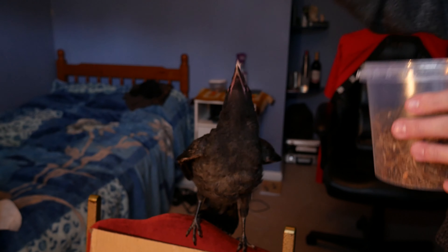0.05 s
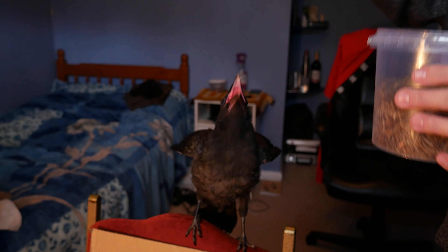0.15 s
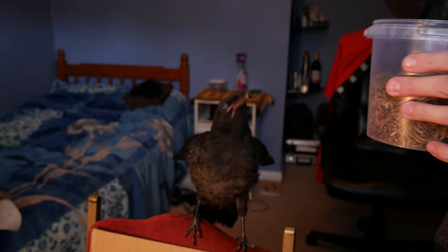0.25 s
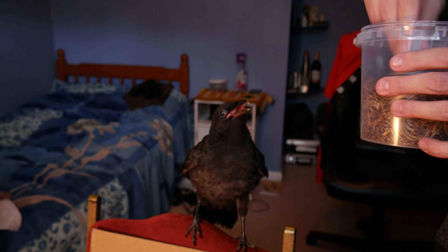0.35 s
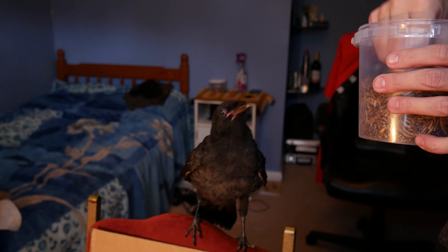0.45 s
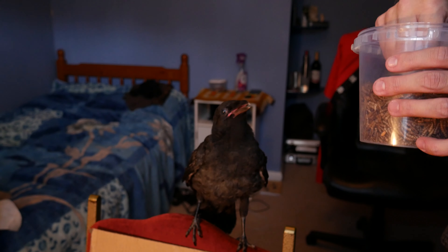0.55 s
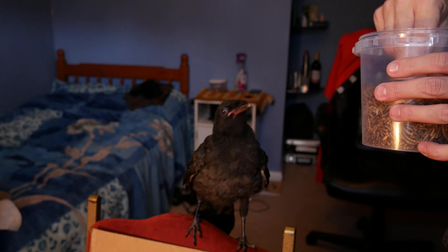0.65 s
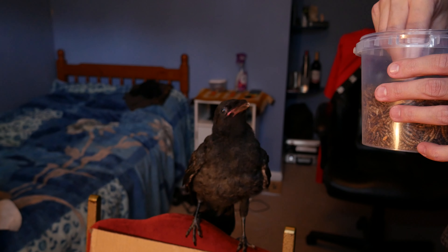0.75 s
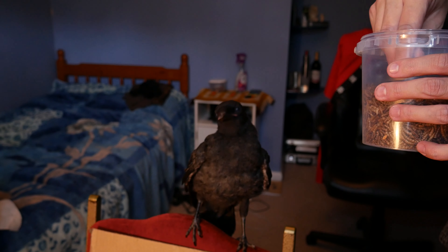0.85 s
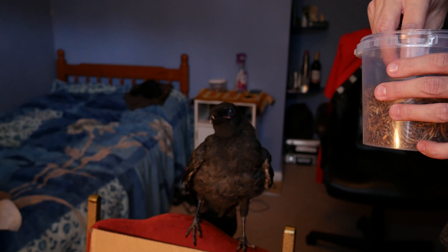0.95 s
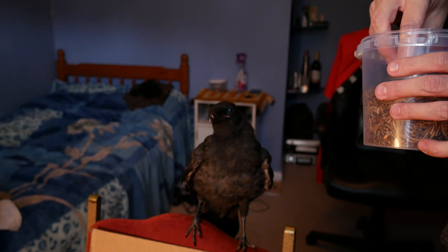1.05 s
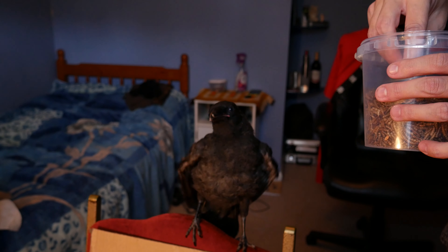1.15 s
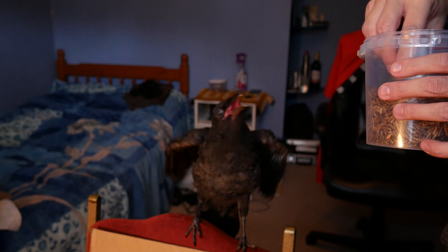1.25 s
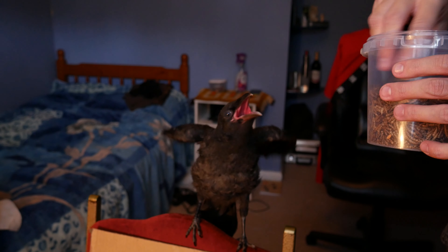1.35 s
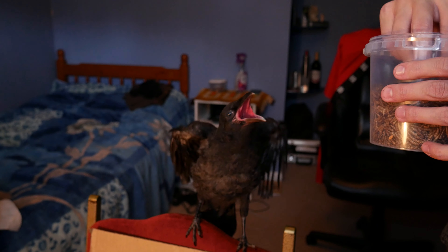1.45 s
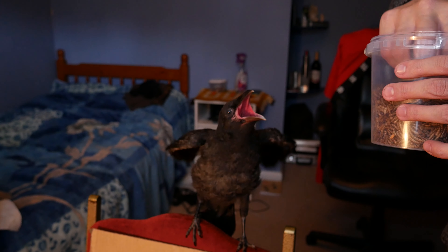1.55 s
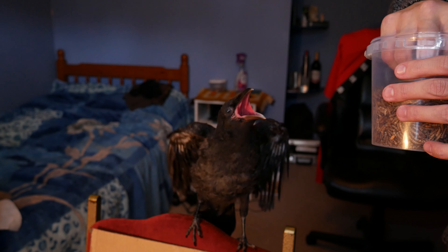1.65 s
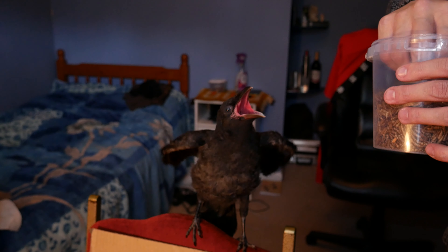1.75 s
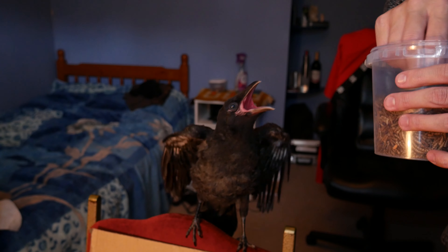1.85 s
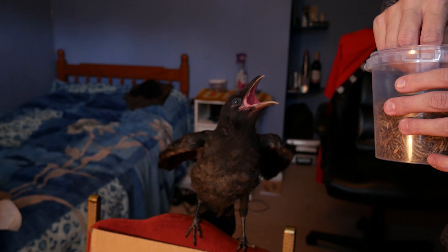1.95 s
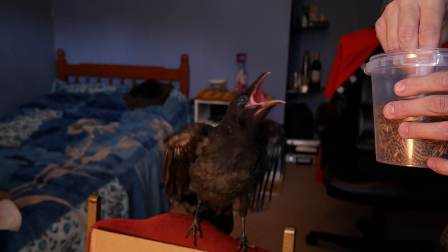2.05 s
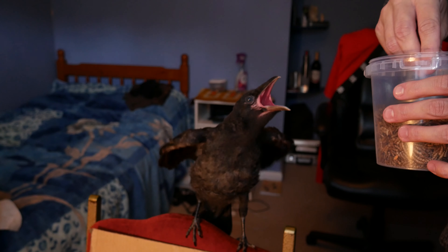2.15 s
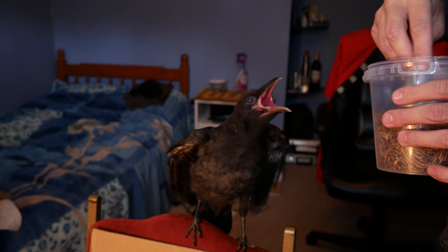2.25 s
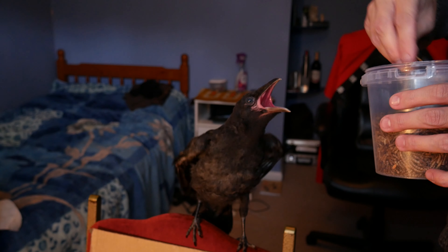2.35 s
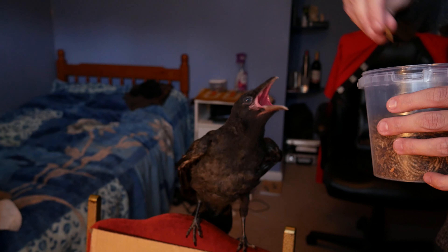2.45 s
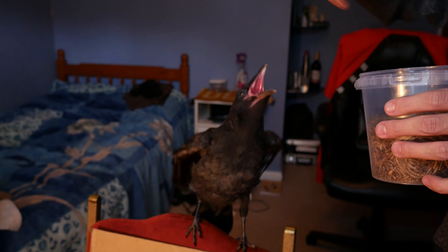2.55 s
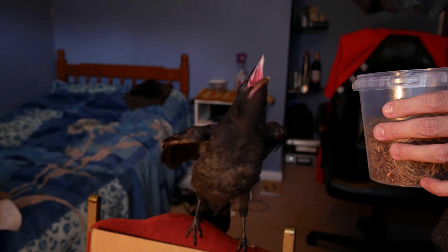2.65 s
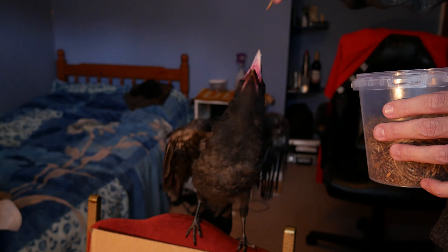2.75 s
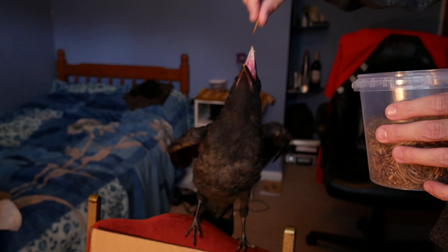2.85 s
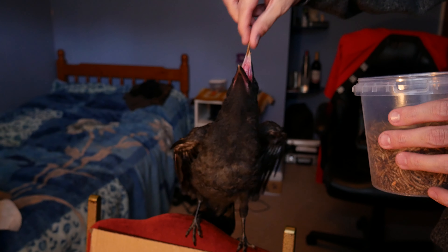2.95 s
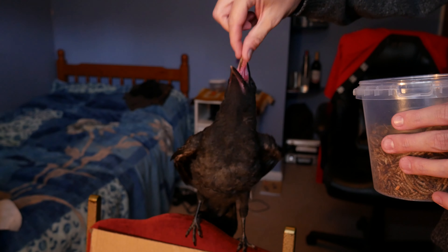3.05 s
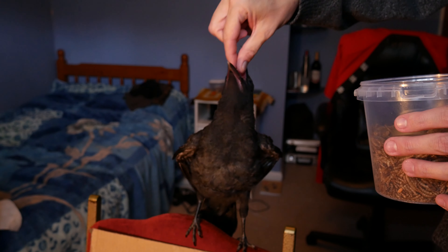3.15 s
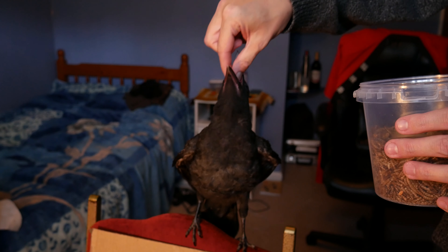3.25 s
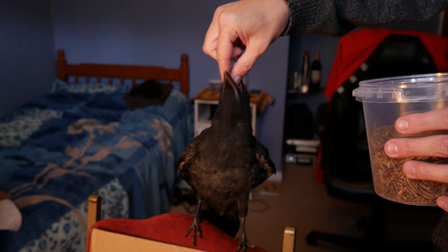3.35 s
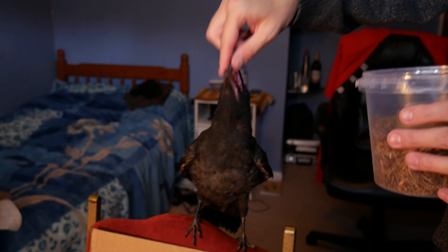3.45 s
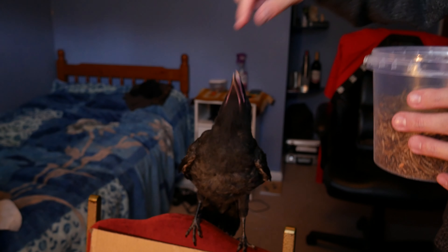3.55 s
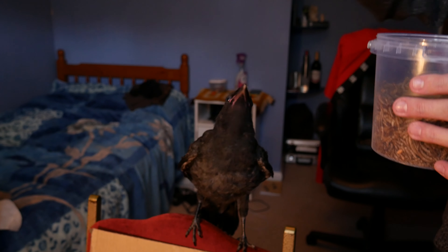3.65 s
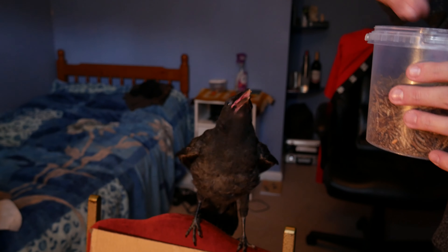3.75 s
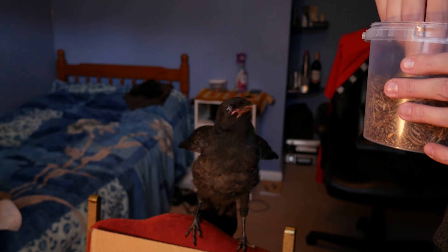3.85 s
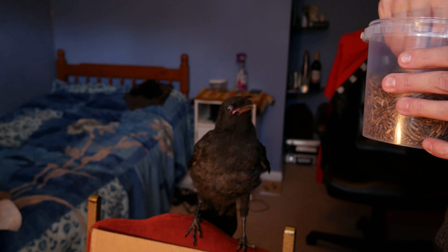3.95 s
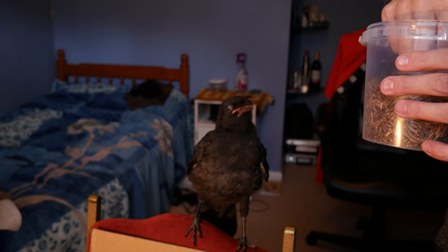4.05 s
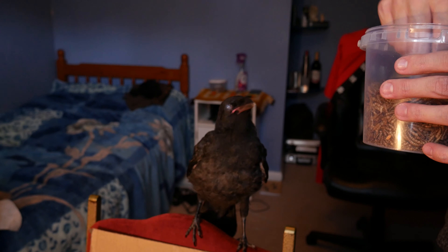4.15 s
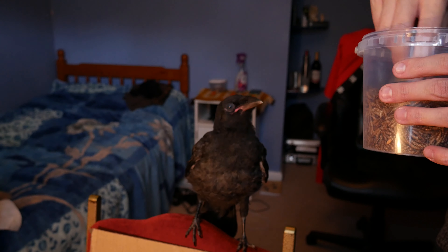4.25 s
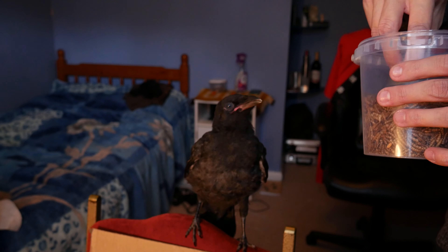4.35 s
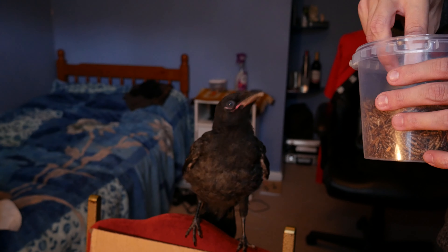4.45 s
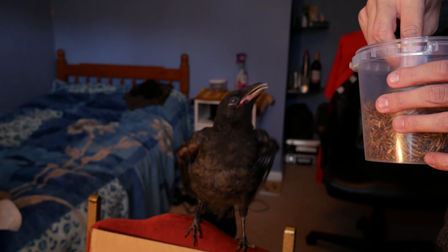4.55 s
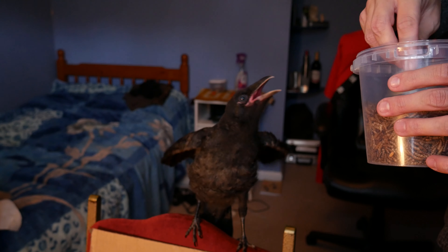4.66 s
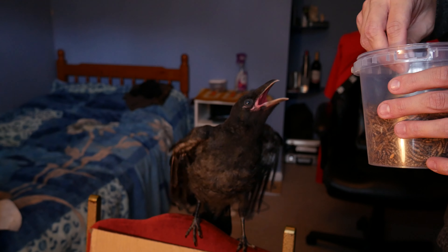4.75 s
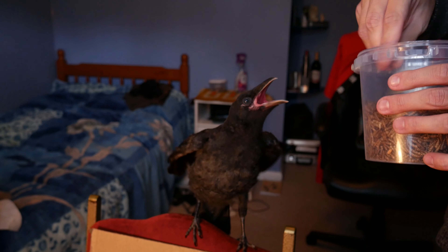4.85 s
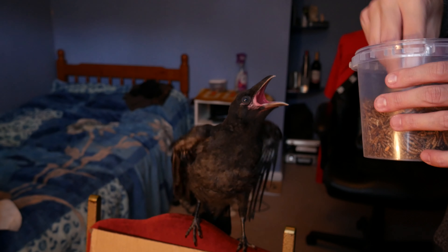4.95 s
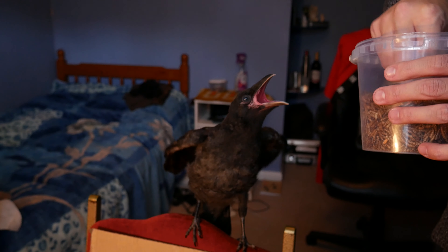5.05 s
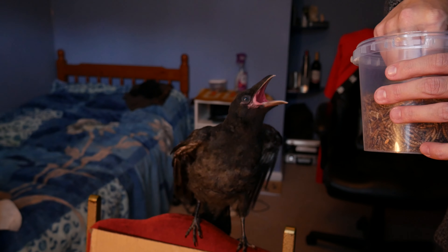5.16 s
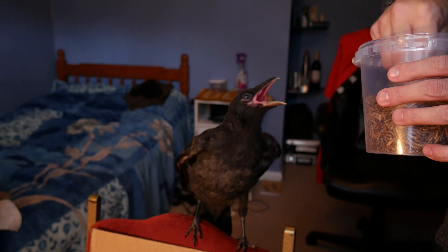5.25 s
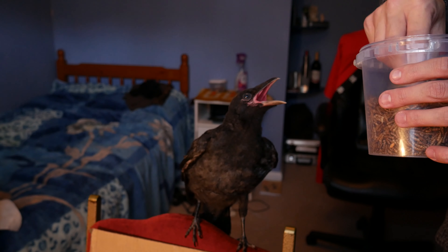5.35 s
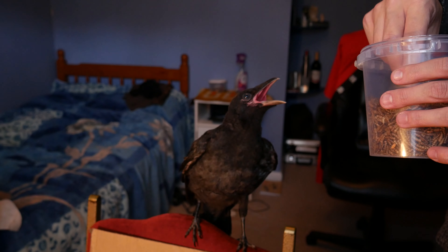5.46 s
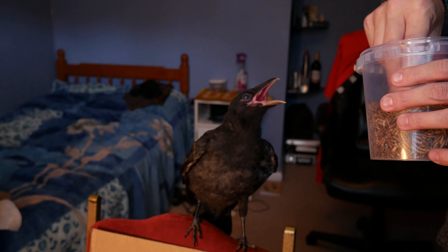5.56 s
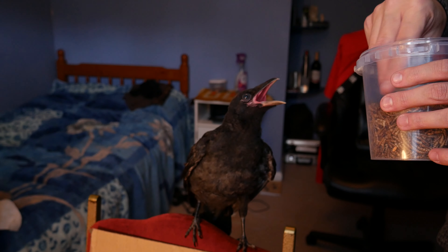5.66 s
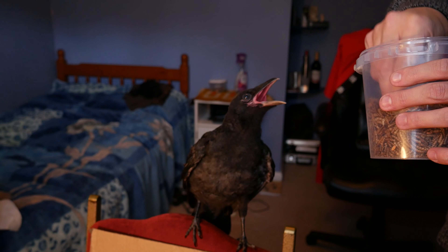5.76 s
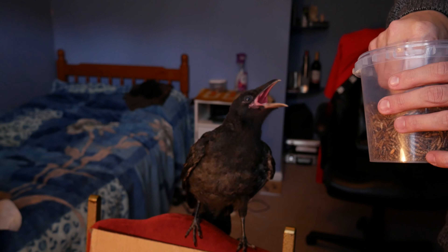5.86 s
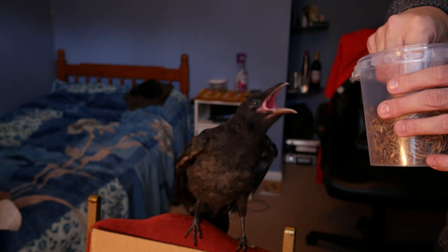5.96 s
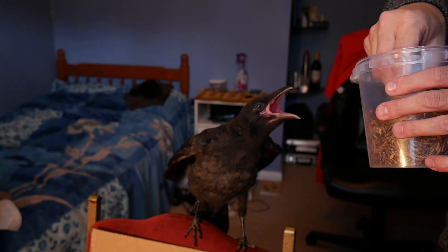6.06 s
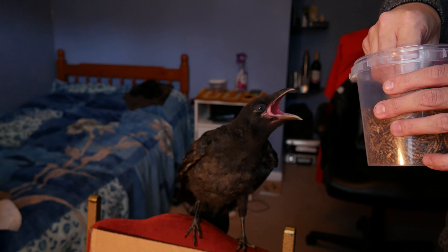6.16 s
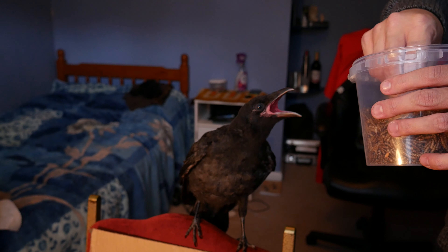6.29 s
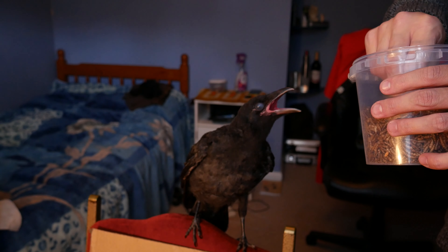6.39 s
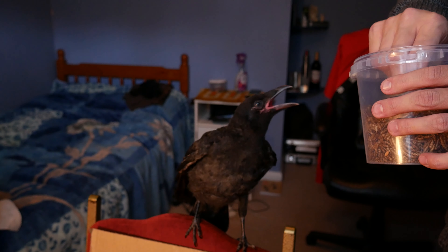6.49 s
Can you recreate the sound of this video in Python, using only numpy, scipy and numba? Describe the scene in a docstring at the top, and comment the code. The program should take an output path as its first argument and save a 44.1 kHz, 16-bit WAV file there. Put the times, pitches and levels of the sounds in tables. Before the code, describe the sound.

A young crow begs with harsh, raspy nasal caws in a small quiet bedroom, with brief rustles of feathers and dry feed between them.

```python
"""A young crow begs in a small, soft bedroom, close to a stereo microphone; a faint hum and hiss runs throughout.
First a soft call dies away and a short caw follows; then feathers and a hand in a tub of dry feed
rustle and tick, with a thin rising squeak. From 1.3 s come five caws, one with a voice break, then more rustling,
a long caw at 4.7 s, feed again and a last caw at 5.9 s. Both halves of the syrinx pulse at unrelated
pitches and disturb each other; windpipe, chest, throat and beak resonances colour the rasp."""
import sys
import numpy as np
from scipy import signal
from scipy.fft import rfft, irfft
from scipy.io import wavfile
from scipy.ndimage import uniform_filter1d
from numba import njit

SR = 44100
rng = np.random.default_rng(int(sys.argv[2]) if len(sys.argv) > 2 else 0)


def to_wav(sig):
    """Store sig (one row per channel, or 1-D mono) as 16-bit WAV at the path in sys.argv[1].

    Samples outside -1..1 are clipped; the rate is SR.
    """
    pcm = np.clip(np.atleast_2d(sig), -1, 1) * 32767
    pcm = np.round(pcm).astype(np.int16)
    wavfile.write(sys.argv[1], SR, pcm.T)  # frames by channels


N = 287708

# One row per caw; the seventh is a voice break inside the caw before it. "first" glides to "last" over length_s:
# start_s, attack_s, length_s (up to the release), start_below_peak_db, peak_db (before settling), sag_db,
# release_db_per_s, high_side_hz first, last, low_side_hz first, last, high_over_low_db first, last,
# roughness_0_to_1 first, last, beak_db first, last, windpipe_db first, last, chest_db first, last,
# top_hiss_db first, last, windpipe_hz, throat_hz first, last, gape_hz first, last, gape_strength_db
CAWS = [ (-.1, .03, .125, 20, -48.5, 1, 200, 520, 520, 299, 301, -8, -4, .7, .7, -20, -15, -4, -4, -4, -5, -18, -22, 590, 2400, 2400, 3800, 3850, 6),
        (.138, .065, .1, 17, -28.5, 1, 340, 590, 505, 300, 320, -8, 8, .5, .38, -9, -10, -6, -17.5, -11, -2.5, -8, -23, 720, 1350, 2720, 4200, 3720, 8),
        (1.29, .036, .4, 18, -29, 3, 370, 540, 521, 377, 338, -2, -7, .14, .3, -5.5, -3, -15, -13, -4, -8, -12.5, -12.5, 660, 2480, 2600, 3850, 3960, 10.5),
        (2.047, .04, .225, 20, -30.5, 3, 340, 508, 505, 300, 289, -6, 1, .38, .55, -4.5, -6, -17, -13.5, -5, -4, -15.5, -20, 625, 2400, 2360, 3800, 3790, 11),
        (2.64, .046, .37, 28, -29, 8, 340, 510, 496, 288, 290, 0, -5, .42, .42, -5.5, -13, -17, -8, -5.5, -4, -22.5, -25, 620, 2340, 2450, 3820, 3570, 11),
        (3.166, .028, .2, 27, -28, 6, 320, 514, 496, 322, 306, 0, -4, .18, .26, -5.5, -7.5, -19, -10.5, -6.5, -6, -13.5, -19, 625, 2510, 2270, 3620, 3580, 9),
        (3.345, .02, .09, 3, -31.5, 8, 300, 505, 500, 314, 325, -4, -10, .25, .6, -6.5, -21, -11, -3, -2.5, -8, -19, -28, 680, 1900, 2080, 4000, 3940, 0.5),
        (3.63, .036, .036, 31, -26, 0.5, 335, 550, 572, 372, 386, 8, 1, .35, .25, -10, -4, -19, -14, -1.5, -6, -30, -24, 645, 2650, 2780, 3520, 3560, 7),
        (4.696, .028, .415, 14, -29.5, 3, 330, 535, 495, 367, 296, -4, -14, .16, .28, -5.5, -5, -13, -14.5, -6.5, -8, -10, -13, 655, 2400, 2540, 4020, 3850, 5.5),
        (5.921, .045, .34, 20, -31, 2, 280, 515, 509, 289, 293, 2, -4, .3, .42, -9, -6.5, -15, -13.5, -5.5, -5.5, -26, -18, 640, 2290, 2360, 4020, 3800, 11),
        ]
# The syrinx pops open: time_s, click_level_db (before gain and band-pass)
SYRINX_POPS = [(0.138, -39), (2.046, -34), (2.643, -27.5), (3.168, -20), (4.696, -22.5), (5.92, -33)]
# Resonances of chest, beak and top end: centre_hz, width_hz, level_db
CHEST_MODES = [(1028, 109, -1.5), (1139, 75, 1.5), (1554, 440, -3.5)]
BEAK_MODES = [(5075, 650, 6), (5896, 176, 10.5), (6020, 1630, 2), (7604, 740, -3.5)]
TOP_MODES = [(9350, 3260, 4), (11330, 3200, -15)]
# A faint rising squeak: time_s, pitch_hz, level_db
SQUEAK = [(.825, 2760, -92), (.84, 2800, -80), (.865, 2870, -78), (.92, 2990, -84), (.95, 3020, -92)]
# Dry feed ticking: time_s, click_level_db (before gain and resonance)
FEED_TICKS = [(0.6994, -64), (0.8144, -62), (0.8944, -57), (0.9344, -58), (1.0051, -61), (1.055, -55),
              (1.1498, -58), (1.8996, -54), (4.336, -61), (4.356, -57), (4.375, -63), (4.5077, -54),
              (4.5494, -59), (5.5536, -52), (5.6431, -60), (5.8185, -41)]
# Feathers and feed: loudest_s, rise_s_per_20_db, fall_s_per_20_db, level_db, fine_scratching_db
RUSTLES = [(.518, .04, .14, -54.5, -59), (.62, .05, .15, -68, -69), (.77, .08, .2, -80, -72),
           (.94, .03, .05, -79, -71), (1.03, .03, .3, -78, -75), (1.91, .06, .12, -72.5, -72),
           (2.03, .04, .05, -75, -73), (4.0, .04, .1, -76, -65), (4.1, .11, .12, -54, -62),
           (4.21, .05, .07, -69, -73), (4.34, .025, .05, -88, -72), (4.515, .025, .2, -84, -75),
           (5.19, .05, .155, -58, -68), (5.645, .08, .06, -76, -71), (5.822, .043, .09, -53.5, -59),
           (5.905, .03, .03, -78, -67), (6.36, .05, .06, -75, -84), (6.44, .06, .3, -82, -78)]
# Spectra of the soft rustle and of the fine scratching: frequency_hz, level_db_per_hz (relative)
RUSTLE_SPECTRUM = [(300, -50), (900, -8), (1800, -7), (3000, -1.5), (4200, -1), (6500, -7.5), (9000, -17.5),
                   (12000, -40)]
SCRATCH_SPECTRUM = [(3000, -55), (5000, -17), (7500, -10), (10000, -3.5), (12500, -7.5), (15500, -12)]
# Floor echo, shifting as the bird moves its head: time_s, lag_ms
FLOOR_LAG = [(1.5, 5.31), (2.2, 5.26), (2.8, 5.15), (3.3, 5.13), (4.9, 5.24), (6.1, 5.26)]
# Echoes off the furniture: lag_ms, level_db
FURNITURE_ECHOES = [(4.0, -19), (5.5, -28.5)]
# Room tone spectrum: frequency_hz, level_db_per_hz (relative)
HUM_SPECTRUM = [(15, -60.5), (25, -46), (104, -5.5), (433, -5.5), (581, -10.5), (647, -6.5), (847, -14),
                (944, -7), (1140, -10.5), (2060, -22.5), (2350, -26.5), (4140, -31), (8790, -36.5),
                (9790, -30.5), (15500, -57)]
# Room tone between the two channels: frequency_hz, left_right_likeness_0_to_1
HUM_LIKENESS = [(60, 0.93), (240, 0.55), (950, 0.65), (3770, 0.23), (15000, 0.21)]
# Room tone balance: frequency_hz, left_over_right_db
HUM_BALANCE = [(60, 4), (240, 2.0), (950, 1.5), (3770, 1.5), (15000, -2)]

THROAT_WIDTH_HZ, GAPE_WIDTH_HZ, WINDPIPE_WIDTH_HZ = 357, 320, 230
SETTLE_DB, SETTLE_S = 2.5, .04     # the first push eases off
RELEASE_KNEE_S = .018     # softens the turn into the release
TRACT_LAG_S = .01     # throat and beak cannot jump

# Changes per dB of level still missing at the start (START) or already lost in the release (TAIL)
START_HIGH_PER_DB, START_LOW_PER_DB = .004, .003     # share of pitch: a caw starts sharp
TAIL_LOW_PER_DB = .004     # share of pitch: the low side drops as the breath runs out
START_ROUGH_PER_DB, TAIL_ROUGH_PER_DB = .015, .025
START_BEAK_PER_DB, START_TOP_PER_DB, START_THROAT_HZ_PER_DB = .8, .55, 18     # beak still shut: dull and low
START_PIPE_PER_DB, TAIL_PIPE_PER_DB = .5, .7     # weak breath leaves mostly the windpipe
START_PIPE_HZ_PER_DB, TAIL_PIPE_HZ_PER_DB = 4.5, 12
TAIL_BEAK_PER_DB, TAIL_TOP_PER_DB, TAIL_CHEST_PER_DB = .15, .3, .3
TAIL_FULL_DB = 14     # the tail's colour stops changing past this loss
PIPE_MOST_DB = -3.5     # the windpipe never takes all

TICK_HZ, TICK_T60_S = 10400, 0.0025
SCRATCH_STRETCH = 1.3     # the fine scratching starts earlier and lasts longer
FLOOR_ECHO_DB = -9
ROOM_T60_S, WALL_CUT_HZ, ROOM_DB = 0.16, 11800, -11     # decay time before the walls dull it
HUM_DB = -62
MIC_DROOP_HZ, CUTOFF_HZ = 11770, 15450


def crow():
    """Windpipe, chest, throat and beak share the rasp; the turbulence is heard most in the treble."""
    gain, source, shares, tract = caw_controls()
    high_hz, low_hz, lead_db, rough = source
    windpipe_hz, throat_hz, gape_hz, gape_db = tract
    snaps, hiss = syrinx(high_hz, low_hz, lead_db, rough)
    rasp = snaps + 0.24 * rough * hiss
    airy = snaps + 0.36 * hiss

    windpipe = resonate(snaps + 0.089 * rough * hiss, windpipe_hz, WINDPIPE_WIDTH_HZ, SR)
    windpipe = band(windpipe, 200, 1065)
    chest = band(modes(rasp, CHEST_MODES), 577, 2280)
    throat = resonate(rasp, throat_hz, THROAT_WIDTH_HZ, SR)
    throat = resonate(throat, throat_hz, 2400.0, SR)
    gape = from_db(gape_db) * resonate(rasp, gape_hz, GAPE_WIDTH_HZ, SR)
    beak = band(modes(rasp, BEAK_MODES) - gape, 2640, 9220)
    top = -band(modes(airy, TOP_MODES), 6300, 15000)

    # the throat gets the power the other parts leave
    throat_share = np.sqrt(np.clip(1 - np.sum(shares ** 2, axis=0), .02, 1))
    voice = throat_share * evened(throat)
    for share, part in zip(shares, (windpipe, chest, beak, top)):
        voice += share * evened(part)
    return gain * voice


def caw_controls():
    """Each caw swells, settles, sags and dies; pitch and colour follow the breath still missing or lost."""
    t, table = np.arange(N) / SR, np.array(CAWS)
    latest = np.searchsorted(table[:, 0], t) - 1     # the caw begun most recently
    (start, attack, length, below_db, peak_db, sag_db, release,
     high0, high1, low0, low1, lead0, lead1, rough0, rough1,
     beak0, beak1, pipe0, pipe1, chest0, chest1, top0, top1,
     pipe_hz, throat0, throat1, gape0, gape1, gape_db) = table[latest].T
    age = t - start
    along = np.clip(age / length, 0, 1)

    def glide(first, last):
        """Straight line from start to release."""
        return first + (last - first) * along

    # level, in dB below the peak
    missing = below_db * np.clip(1 - age / attack, 0, 1) ** 2
    lost = release * RELEASE_KNEE_S * np.logaddexp(0, (age - length) / RELEASE_KNEE_S)
    tail = np.minimum(lost, TAIL_FULL_DB)
    eased = SETTLE_DB * (1 - np.exp(-np.maximum(age - attack, 0) / SETTLE_S))
    level_db = peak_db - missing - eased - sag_db * along - lost
    gain = uniform_filter1d(from_db(level_db), size=SR // 500)

    high_hz = glide(high0, high1) * (1 + START_HIGH_PER_DB * missing)
    low_hz = glide(low0, low1) * (1 + START_LOW_PER_DB * missing - TAIL_LOW_PER_DB * tail)
    rough = glide(rough0, rough1) + START_ROUGH_PER_DB * missing + TAIL_ROUGH_PER_DB * tail
    source = high_hz, low_hz, glide(lead0, lead1), np.clip(rough, 0, 1)

    pipe_db = glide(pipe0, pipe1) + START_PIPE_PER_DB * missing + TAIL_PIPE_PER_DB * tail
    chest_db = glide(chest0, chest1) - TAIL_CHEST_PER_DB * tail
    beak_db = glide(beak0, beak1) - START_BEAK_PER_DB * missing - TAIL_BEAK_PER_DB * tail
    top_db = glide(top0, top1) - START_TOP_PER_DB * missing - TAIL_TOP_PER_DB * tail
    shares_db = [np.minimum(pipe_db, PIPE_MOST_DB), chest_db, beak_db, top_db]
    lag = int(TRACT_LAG_S * SR)
    shares = uniform_filter1d(from_db(np.minimum(shares_db, 0)), size=lag)

    windpipe_hz = pipe_hz + START_PIPE_HZ_PER_DB * missing + TAIL_PIPE_HZ_PER_DB * tail
    throat_hz = glide(throat0, throat1) - START_THROAT_HZ_PER_DB * missing
    tract = np.array((windpipe_hz, throat_hz, glide(gape0, gape1), gape_db))
    return gain, source, shares, uniform_filter1d(tract, size=lag)


def syrinx(high_hz, low_hz, lead_db, rough):
    """Each side snaps shut once a cycle; the other side's phase and chance shake its timing and force."""
    high, low = np.cumsum(high_hz) / SR, np.cumsum(low_hz) / SR     # cycles
    snaps, hiss = np.zeros(N), np.zeros(N)
    for own, other, side_db in ((high, low, lead_db / 2), (low, high, -lead_db / 2)):
        hoarse = rough * from_db(3.0 * drift(12))     # each side breaks up in fits
        wander = np.cumsum(hoarse * 18.0 * drift(25)) / SR     # pitch wavers by some Hz: cycles gained
        pull = .025 * np.sin(2 * np.pi * other)
        jitter = hoarse * .11 * drift(120)
        shaken = np.maximum.accumulate(own + wander + pull + jitter)     # never runs backwards
        snap = np.diff(np.floor(shaken), prepend=0)
        force = (1 + 0.17 * np.cos(2 * np.pi * other)) * from_db(hoarse * 5.5 * rng.standard_normal(N))
        snaps -= from_db(side_db + rough * 3.53 * drift(30.5)) * force * snap
        # the air's hiss pulses with the cycle, strongest around the snap
        pulsing = 1 + .6 * np.cos(2 * np.pi * shaken)
        hiss += from_db(side_db) * pulsing * rng.standard_normal(N)
    return snaps, hiss


def syrinx_pops():
    """A broad pop as the syrinx opens: single clicks through a band-pass."""
    return from_db(8.5) * band(clicks_at(SYRINX_POPS) + 1e-18, 300, 3700)


def feed_ticks():
    """Tiny bright bursts as dry pieces shift: quickly dying noise through a resonance."""
    decay = from_db(-60 / (TICK_T60_S * SR))
    envelope = signal.lfilter([1], [1, -decay], clicks_at(FEED_TICKS) + 1e-18)
    burst = envelope * rng.standard_normal(N)
    return from_db(2.5) * resonate(burst, np.full(N, float(TICK_HZ)), 6000., SR)


def squeak():
    """A thin sine, rising in pitch and slightly unsteady in level."""
    t = np.arange(N) / SR
    hz, level_db = in_time(SQUEAK)
    inside_s = np.minimum(t - SQUEAK[0][0], SQUEAK[-1][0] - t)
    fade = np.clip(inside_s / .002 + 1, 0, 1)     # 2 ms at either end
    return from_db(level_db + 3.3 * drift(40)) * fade * np.sin(2 * np.pi * np.cumsum(hz) / SR)


def rustle():
    """Soft, uneven friction noise; the finer scratching sits higher."""
    s, rise, fall, level_db, fine_db = np.array(RUSTLES).T[:, :, None]
    t = np.arange(0, N + 64, 64) / SR     # coarse steps for the envelopes
    away_db = 20 * np.maximum((s - t) / rise, (t - s) / fall)

    def swells(db):
        """Sum the rustles' powers into one envelope."""
        return np.interp(np.arange(N) / SR, t, np.sqrt(np.sum(from_db(db) ** 2, axis=0)))

    likeness = [(1000, 0.87), (12000, 0.75)]     # Hz, left-right likeness
    soft = from_db(1.4 * drift(43)) * coloured(RUSTLE_SPECTRUM, likeness)
    scratching = from_db(2.0 * drift(80)) * coloured(SCRATCH_SPECTRUM, likeness)
    return swells(level_db - away_db) * soft + swells(fine_db - away_db / SCRATCH_STRETCH) * scratching


def echoes(x):
    """First bounces off the floor and the furniture; they comb the rasp into fine strands."""
    out = from_db(FLOOR_ECHO_DB) * delayed(x, in_time(FLOOR_LAG)[0])
    for lag_ms, db in FURNITURE_ECHOES:
        out += from_db(db) * delayed(x, lag_ms)
    return out


def bedroom(x):
    """Eight feedback delays a side, duller on every round, stepped block by block."""
    out, dull = np.zeros((2, N)), np.exp(-2 * np.pi * WALL_CUT_HZ / SR)
    lags = (rng.uniform(.006, .026, size=16) * SR).astype(int)     # samples
    for k, lag in enumerate(lags):
        loop, state = x.copy(), [0.]
        gain = from_db(-60 * lag / SR / ROOM_T60_S)
        for i in range(lag, N, lag):
            back, state = signal.lfilter([gain * (1 - dull)], [1, -dull], loop[i - lag:i], zi=state)
            loop[i:i + lag] += back[:N - i]
        out[k % 2] += (loop - x) * (-1) ** (k // 2)     # reflections only, signs mixed
    return out


def room_tone():
    """Steady hum and hiss from shaped noise, its bass leaning left."""
    left_over_right_db = at_hz(HUM_BALANCE, bin_hz())
    lean = from_db(left_over_right_db * [[.5], [-.5]])
    return from_db(HUM_DB) * irfft(rfft(coloured(HUM_SPECTRUM, HUM_LIKENESS)) * lean, N)


def from_db(db):
    """dB to gain."""
    return 10 ** (np.asarray(db) / 20)


def rms_one(x):
    """Scale to rms 1."""
    return x / np.sqrt(np.mean(x ** 2) + 1e-20)


def evened(x):
    """Level held near rms 1 over 40 ms."""
    return x / np.sqrt(uniform_filter1d(x ** 2, size=SR // 25) + 1e-12)


def in_time(table):
    """A table's columns against its times, joined by straight lines."""
    s, *columns = np.array(table).T
    return [np.interp(np.arange(N) / SR, s, column) for column in columns]


def clicks_at(table):
    """Single-sample clicks at the table's times and levels."""
    clicks = np.zeros(N)
    for s, db in table:
        clicks[round(s * SR)] = from_db(db)
    return clicks


def bin_hz():
    """Frequencies of the whole-length spectrum, at least 1 Hz."""
    return np.maximum(np.arange(N // 2 + 1) * SR / N, 1)


def at_hz(points, hz):
    """Read a spectrum on a log-frequency axis."""
    point_hz, values = np.array(points).T
    return np.interp(np.log(hz), np.log(point_hz), values)


def drift(rate_hz):
    """Slow chance: noise through a double one-pole low-pass; spread 1."""
    r = np.exp(-2 * np.pi * rate_hz / SR)
    slow = signal.lfilter([1], [1, -2 * r, r * r], rng.standard_normal(N + SR))
    return rms_one(slow[SR:])     # skip the filter's first second


def coloured(spectrum, likeness):
    """Stereo noise with a spectrum and a left-right likeness; rms 1."""
    hz = bin_hz()
    mid, side = rfft(rng.standard_normal((2, N))) * from_db(at_hz(spectrum, hz))
    alike = np.clip(at_hz(likeness, hz), 0, 1)
    return rms_one(irfft(np.sqrt(1 + alike) * mid + np.sqrt(1 - alike) * side * [[1], [-1]], N))


@njit
def resonate(x, hz, width_hz, sr):
    """Two-pole resonance with a moving centre, gain about 1 on top."""
    y, r = np.zeros(len(x)), np.exp(-np.pi * width_hz / sr)
    for i in range(2, len(x)):
        drive = (1 - r * r) / 2 * (x[i] - x[i - 2])
        y[i] = drive + 2 * r * np.cos(2 * np.pi * hz[i] / sr) * y[i - 1] - r * r * y[i - 2]
    return y


def modes(x, table):
    """Resonances in parallel, signs alternating."""
    out = np.zeros(N)
    for k, (hz, width_hz, db) in enumerate(table):
        out += (-1) ** k * from_db(db) * resonate(x, np.full(N, float(hz)), width_hz, SR)
    return out


def band(x, low_hz, high_hz):
    """Steep band-pass."""
    return signal.sosfilt(signal.butter(3, [low_hz, high_hz], "band", fs=SR, output="sos"), x)


def delayed(x, lag_ms):
    """Read the sound a little later."""
    return np.interp(np.arange(N) - lag_ms * SR / 1000, np.arange(N), x, left=0)


def scene():
    """Bird, ticks, squeak and first echoes in the middle; reverberation, rustle and room tone in stereo."""
    middle = crow() + syrinx_pops() + feed_ticks() + squeak()
    return middle + echoes(middle) + from_db(ROOM_DB) * bedroom(middle) + rustle() + room_tone()


def record(dry):
    """The microphone droops in the treble; the top is cut steeply."""
    heard = signal.sosfilt(signal.butter(2, MIC_DROOP_HZ, fs=SR, output="sos"), dry)
    return signal.sosfilt(signal.ellip(10, .5, 70, CUTOFF_HZ, fs=SR, output="sos"), heard)


dry = scene()
out = record(dry)
to_wav(out)
```